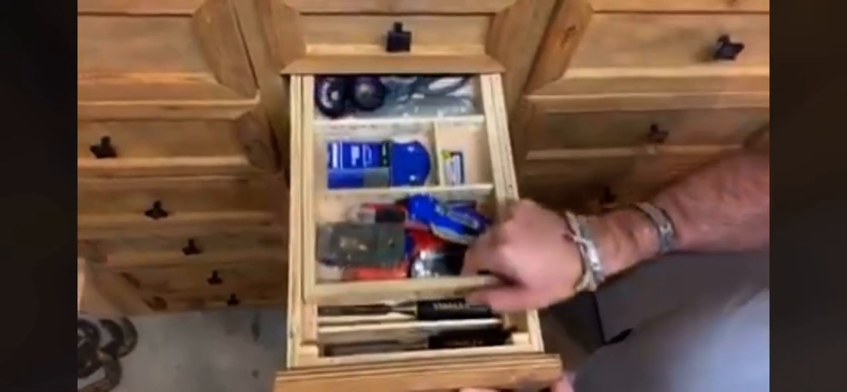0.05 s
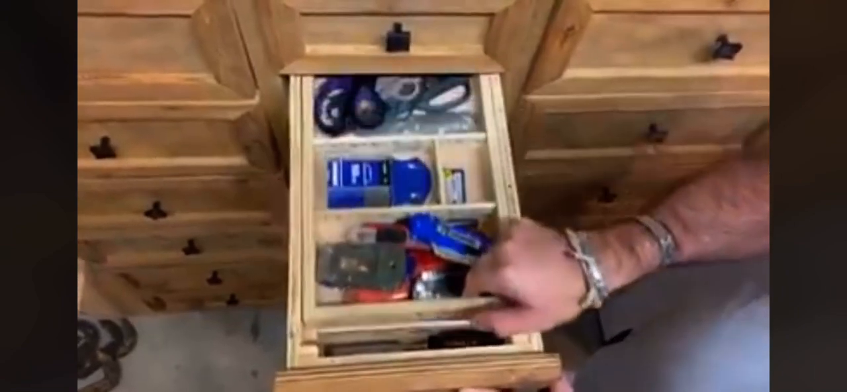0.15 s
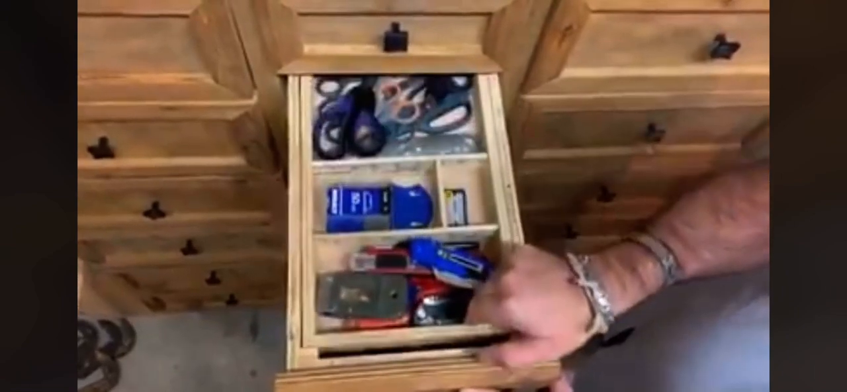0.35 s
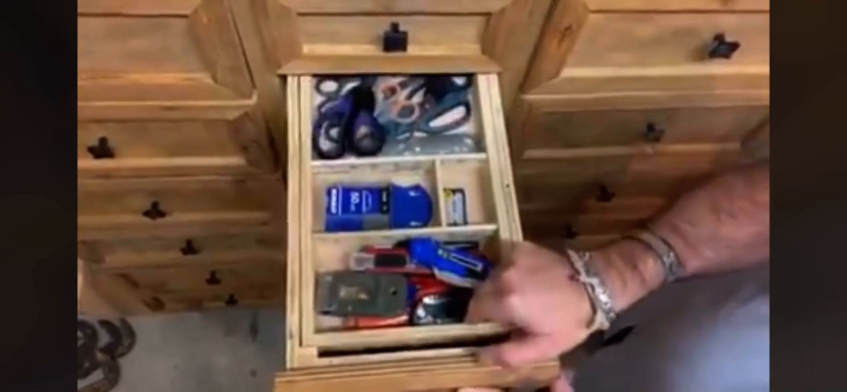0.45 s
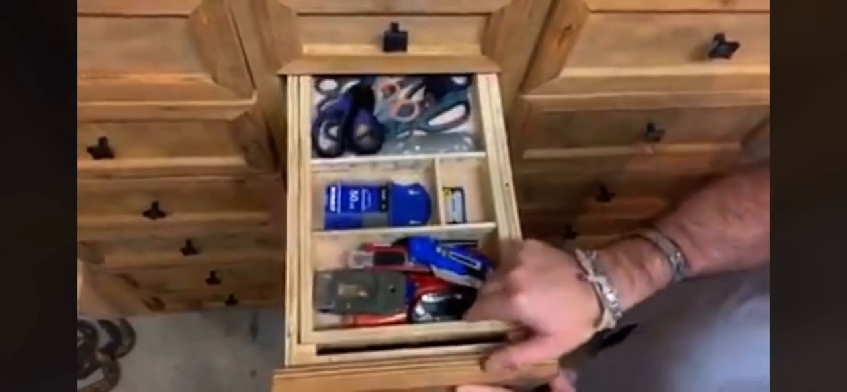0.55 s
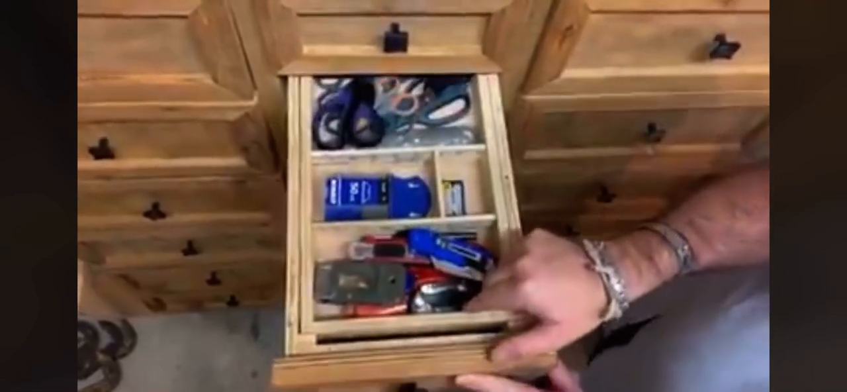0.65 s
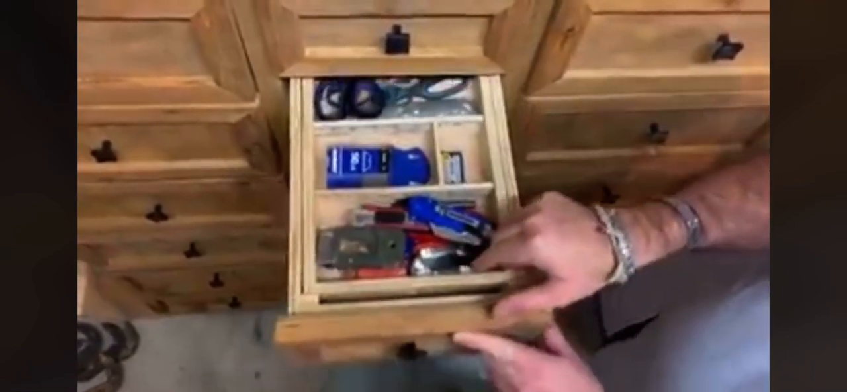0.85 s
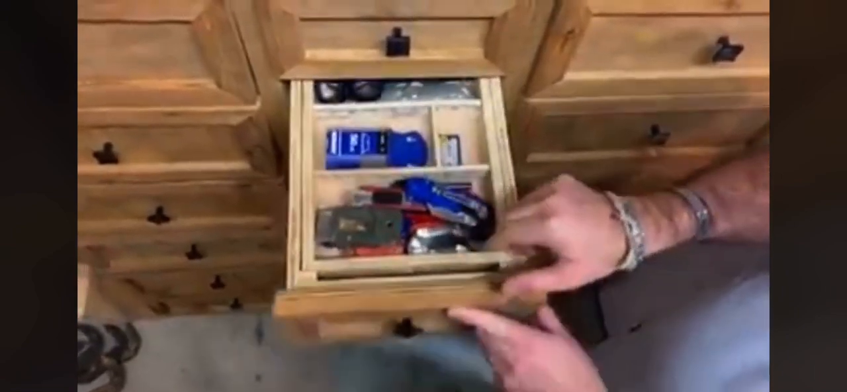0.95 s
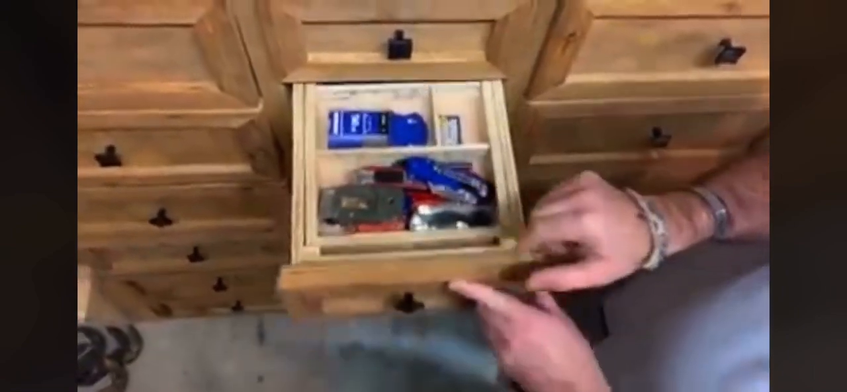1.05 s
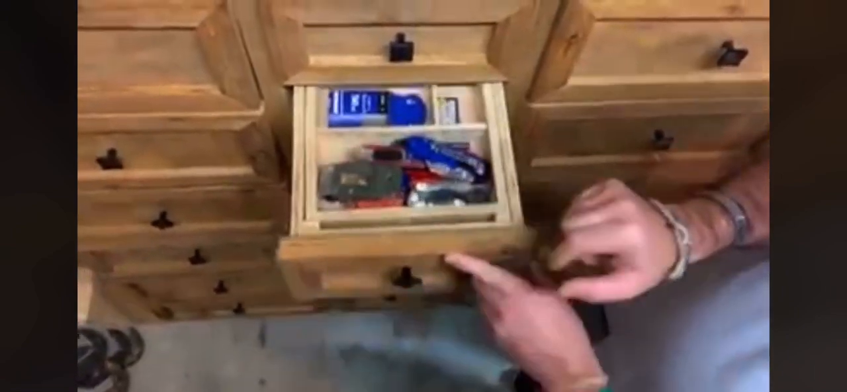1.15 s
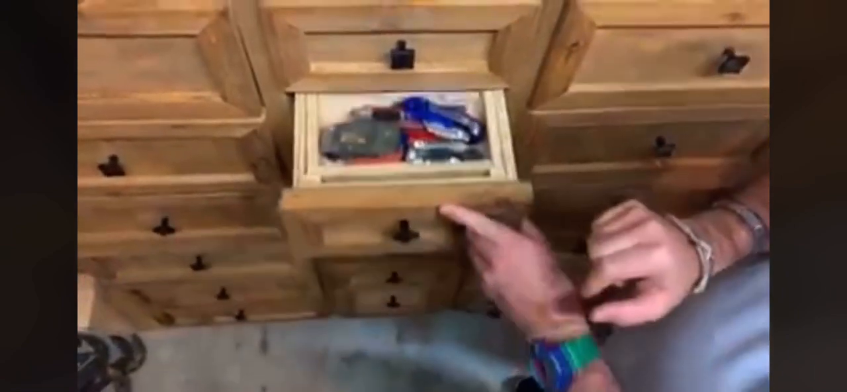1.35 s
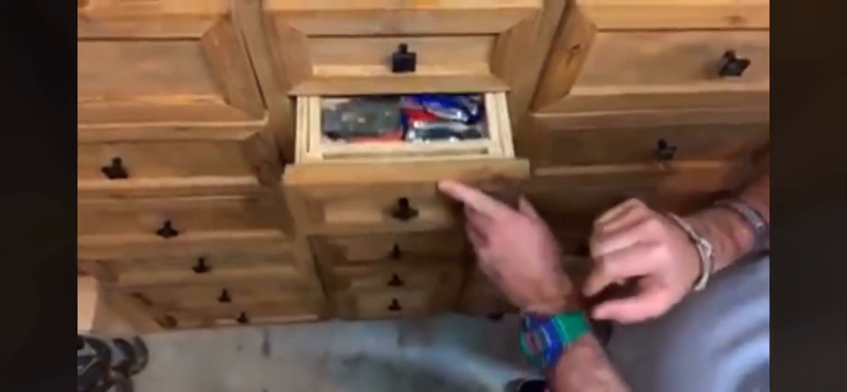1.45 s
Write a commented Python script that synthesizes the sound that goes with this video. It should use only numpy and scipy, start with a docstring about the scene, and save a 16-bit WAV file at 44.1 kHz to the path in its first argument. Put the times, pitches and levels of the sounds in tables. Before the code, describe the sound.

A wooden drawer is pushed in. First a tray inside it scrapes and knocks sharply, rattling small metal tools; then the drawer rubs along and jolts with another clatter. Heard from just above, over a low workshop rumble.

```python
"""A workshop, over a low room rumble. A wooden tray scrapes along inside a chest drawer, knocks on its
front and bounces, rattling the small tools in it. Then the drawer is pushed in: a soft rub, a jolt that
makes the tools clatter, more rub. Catching grain and short knocks ring the wood; the metal tools clink.
A phone above hears it all in stereo, its two ports out of step in the treble."""
import sys
import numpy as np
from scipy import signal
from scipy.fft import rfft, irfft
from scipy.io import wavfile
from scipy.ndimage import uniform_filter1d

SR = 44100
rng = np.random.default_rng(int(sys.argv[2]) if len(sys.argv) > 2 else 0)


def file_out(sig):
    """Save sig as 16-bit WAV at sys.argv[1]."""
    # one column per channel
    cols = np.atleast_2d(sig).T
    # limit, then scale
    lim = np.clip(cols, -1, 1)
    pcm = np.round(lim * 32767).astype(np.int16)
    wavfile.write(sys.argv[1], SR, pcm)


N = 66150

# The tray hits the front and bounces: start_s, level_db, contact_ms
TRAY_KNOCKS = [(.2175, -11.5, 0.53), (.2245, -9.5, 0.61), (.2295, -27, 0.35), (.235, -15, 0.37)]
# Jolts of the drawer: start_s, level_db, contact_ms
DRAWER_KNOCKS = [(.22, -20.5, 0.82), (.246, -20, 0.68), (.345, -40, 0.79), (.37, -38, 0.63),
                 (.75, -40.5, 2.46), (.801, -42, 0.27), (.999, -33.5, 0.69), (1.04, -40, 3.9),
                 (1.056, -39, 0.21), (1.071, -34.5, 0.18), (1.094, -24, 0.67), (1.122, -45, 0.18),
                 (1.198, -25.5, 2.64), (1.265, -44, 0.5), (1.333, -68, 0.33), (1.38, -53, 0.37)]
# Ring of the wooden tray: pitch_hz, gain_db, t60_s
TRAY_MODES = [(151, -12, 0.11), (221.2, -6, 0.16), (479.6, 5, 0.055), (546.2, -7.5, 0.15),
              (651, -3.5, 0.082), (824, -11.5, 0.25), (870, -11.5, 0.079), (948, -9.5, 0.16),
              (1106, -1.5, 0.077), (1216, 1.5, 0.071), (1384, -7, 0.068), (1503, -17.5, 0.27),
              (1695, -3.5, 0.11)]
# Ring of the hollow drawer: pitch_hz, gain_db, t60_s
DRAWER_MODES = [(123, -4, 0.1), (196, -17, 0.11), (231, -9, .2), (357.8, -8, 0.14), (388.4, -1, 0.27),
                (422, -6.5, 0.27), (704, -14.5, 0.32), (976, -15, 0.31), (1203, -10.5, 0.49),
                (1340, -3.5, 0.21), (1556, -22, 0.23), (2360, -0.5, 0.082), (3000, -16.5, 0.12)]
# EQ of the thud under each knock: freq_hz, gain_db
THUD_EQ = [(50, -12), (150, -5.5), (230, 1.5), (310, -9.5), (480, 2), (1000, -3), (1600, -11.5),
           (2700, -18.5), (4500, -28.5), (8000, -46.5)]
# Bursts of tools clicking together: start_s, level_db, t60_s, clink_db, treble_lift_db
RATTLES = [(0.222, -41, 0.066, -34.5, 10.5), (0.234, -30.5, 0.087, -32.5, -1.5),
           (.254, -33.5, 0.09, -46, 0), (0.275, -56.5, 0.14, -49, -1.5), (.535, -63, 0.46, -69, -0.5),
           (.681, -61, 0.067, -65, -13), (1.058, -47.5, 0.13, -49, -4), (1.072, -39.5, 0.21, -44, 1),
           (1.087, -34.5, 0.095, -36.5, 0), (1.098, -33, 0.089, -34.5, -0.5), (1.148, -42, 0.073, -45, 4),
           (1.171, -47.5, 0.16, -57, 4.5), (1.301, -43.5, 0.028, -64, 2)]
# Ring of the small metal tools: pitch_hz, gain_db, t60_s
TOOL_MODES = [(2594, -8, .06), (3210, -15, 0.16), (3750, -24, .1), (4003, -3, 0.039), (6285, -19.5, 0.053),
              (7240, 2, 0.034), (7790, -11.5, 0.062)]
# EQ of their clicks: freq_hz, gain_db
RATTLE_EQ = [(300, -11.5), (900, 2.5), (1800, -2.5), (2600, 6.5), (3500, 0), (4800, 0), (6500, -6.5),
             (8000, -26)]
# Rubbing pressure of the tray: time_s, level_db
TRAY_PRESSURE = [(0.0, -36.5), (0.03, -42.5), (0.04, -40.5), (0.06, -38), (0.11, -45.5), (0.194, -42),
                 (0.2, -39.5)]
# Rubbing pressure of the drawer: time_s, level_db
DRAWER_PRESSURE = [(.5, -72), (.53, -61.5), (.56, -59), (.6, -67.5), (.66, -63), (.69, -60.5), (.77, -60.5),
                   (.82, -59), (.9, -55), (1.0, -52), (1.045, -52.5), (1.09, -40.5), (1.19, -46.5),
                   (1.23, -51), (1.29, -52.5), (1.33, -49.5), (1.41, -50), (1.5, -62.5)]
# EQ of the tray's scrape: freq_hz, gain_db
TRAY_RUB_EQ = [(60, -26), (200, -10), (320, -16.5), (700, -0.5), (1300, -10.5), (2000, -16), (3000, -16),
               (5000, -19), (8000, -27.5)]
# EQ of the drawer's rub: freq_hz, gain_db
DRAWER_RUB_EQ = [(60, -18.5), (150, -1.5), (400, -2.5), (750, -9.5), (1250, -3), (1900, -12.5), (2300, -12),
                 (2500, -9.5), (2750, -13), (3500, -14), (4500, -13.5), (8000, -39)]
# Low swell, up while the drawer moves: time_s, level_db
SWELL_LEVEL = [(0.0, -64.5), (0.178, -51), (0.48, -60), (0.664, -50), (0.848, -49.5), (1.114, -46),
               (1.236, -49), (1.5, -49.5)]
# EQ of that swell: freq_hz, gain_db
SWELL_EQ = [(25, -31), (60, -2), (125, -1), (170, -3.5), (210, 1.5), (300, -11.5), (500, -17.5),
            (8000, -93.5)]
# EQ of the room rumble: freq_hz, gain_db
RUMBLE_EQ = [(25, -13.5), (60, -5), (150, -3.5), (250, -6), (500, -11), (1000, -23), (2000, -31.5),
             (4000, -43), (8000, -51.5)]
# Width, the part of the room that differs between the ports: freq_hz, gain_db
SIDE_EQ = [(60, -17.5), (200, -33.5), (400, -15.5), (600, -3.5), (1000, -8), (2200, -1.5), (3300, -9.5),
           (4500, -31), (6500, -20.5), (8000, -12)]
# Balance between the ports: freq_hz, left_over_right_db
BALANCE = [(100, 0), (300, -1.2), (600, 1.4), (1200, 1.9), (2500, .5), (4500, 0), (6000, 0), (8000, -1.9)]
# Phase lag of the left port: freq_hz, lag_rad
LEFT_LAG = [(60, 0), (3400, .2), (4650, 3.05), (5650, 3.2), (6450, 6.2), (8000, 6.4)]

THUD_DB, THUD_T60_S = -8, 0.073
RATTLE_RISE_S, TREBLE_HZ, CLINK_SPREAD_DB = .002, 4040, 3
ROOM_DB, ROOM_T60_S, RUMBLE_DB = -13, 0.38, -52.5
TOP_HZ = 8050
TIME, TAIL_TIME = np.arange(N) / SR, np.arange(SR // 2) / SR


def wood_knocks(hits, modes):
    """Half-sine pushes ring the wood, brighter the shorter the contact; a noisy thud adds body."""
    force, thud_power = np.zeros(N), np.zeros(N)
    for start_s, level_db, contact_ms in hits:
        push = np.sin(np.pi * np.clip((TIME - start_s) / contact_ms * 1000, 0, 1))
        force += undb(level_db) * push / np.sum(push)
        thud_db = level_db + THUD_DB - 20 * np.log10(2 * contact_ms)
        thud_power += decay(start_s, thud_db, THUD_T60_S) ** 2
    thud = eq(np.sqrt(thud_power) * rng.standard_normal(N), THUD_EQ)
    return ring(force, modes) + thud


def tool_rattle():
    """Each jolt clinks the tools with a random mix of their modes; dense clicks die away after it."""
    clicks = grains(per_s=2500, spread_db=0.5)
    scatter_db = CLINK_SPREAD_DB * rng.standard_normal((len(RATTLES), len(TOOL_MODES)))
    low_power, high_power, clinks = np.zeros((3, N))
    for (start_s, level_db, t60_s, clink_db, lift_db), offsets_db in zip(RATTLES, scatter_db):
        attack = np.clip((TIME - start_s) / RATTLE_RISE_S, 0, 1)
        power = (attack * decay(start_s, level_db, t60_s)) ** 2
        low_power += power
        high_power += power * undb(2 * lift_db)
        tick = np.zeros(N)
        tick[int(start_s * SR)] = undb(clink_db)
        modes = [(hz, db + offset_db + lift_db * (hz > TREBLE_HZ), ring_s)
                 for (hz, db, ring_s), offset_db in zip(TOOL_MODES, offsets_db)]
        clinks += ring(tick, modes)

    def band(power, kind):
        crossover = signal.butter(2, TREBLE_HZ, kind, fs=SR, output="sos")
        return signal.sosfilt(crossover, eq(np.sqrt(power) * clicks, RATTLE_EQ))
    # Flipping the highs avoids a notch at the crossover.
    return clinks + band(low_power, "low") - band(high_power, "high")


def wood_rub(pressure, tone, modes, ring_db, stop_s=N / SR):
    """Wood grain catches and slips thousands of times a second and sets the wood ringing."""
    friction = eq(grains(per_s=6000, spread_db=1.5) * undb(flicker_db(rate_hz=60.67)), tone)
    pressure_db = np.interp(TIME, *np.transpose(pressure), left=-99)
    scrape = undb(pressure_db) * (TIME < stop_s) * friction
    return scrape + undb(ring_db) * ring(scrape, modes) / np.std(ring(friction, modes))


def low_swell():
    """Bass noise that rises while the drawer moves."""
    level_db = np.interp(TIME, *np.transpose(SWELL_LEVEL))
    return undb(level_db) * eq(rng.standard_normal(N), SWELL_EQ)


def room_reverb(sound):
    """The workshop's reflections blur into a short noise tail."""
    tail = rng.standard_normal(len(TAIL_TIME)) * 1000. ** (-TAIL_TIME / ROOM_T60_S)
    return signal.fftconvolve(sound, tail / np.linalg.norm(tail))[:N]


def room_rumble():
    """A bed of dark noise whose level flickers slightly."""
    return undb(RUMBLE_DB + flicker_db(rate_hz=24)) * eq(rng.standard_normal(N), RUMBLE_EQ)


def phone_ports(mid, side):
    """Two ports hear the side signal in opposite polarity; the left one lags in the treble."""
    hz = np.arange(N // 2 + 1) * SR / N
    mid, side = rfft(mid), rfft(side) * undb(curve_at(SIDE_EQ, hz))
    tilt = undb(curve_at(BALANCE, hz) / 2)
    left = (mid + side) * tilt * np.exp(-1j * curve_at(LEFT_LAG, hz))
    right = (mid - side) / tilt
    return irfft(np.array([left, right]), N)


def ring(force, modes):
    """A force excites decaying modes; neighbours swing in opposite senses."""
    response = sum((-1) ** k * undb(db) * np.sin(2 * np.pi * hz * TAIL_TIME)
                   * 1000. ** (-TAIL_TIME / t60_s) for k, (hz, db, t60_s) in enumerate(modes))
    return signal.fftconvolve(force, response / np.max(np.abs(response)))[:N]


def grains(per_s, spread_db):
    """Random clicks, few of them large; rms 1."""
    chance, polarity, size = rng.random((N, 3)).T
    strength = undb(-spread_db * np.log(1 - size))
    return unit_rms((chance < per_s / SR) * np.sign(polarity - .5) * strength)


def flicker_db(rate_hz):
    """A smooth random level wobble of 1 dB rms."""
    hold = int(SR / rate_hz)
    steps = np.repeat(rng.standard_normal(N // hold + 1), hold)
    return unit_rms(uniform_filter1d(steps, hold)[:N])


def eq(sound, curve, size=4096):
    """Minimum-phase EQ of unit energy."""
    cepstrum = irfft(curve_at(curve, np.arange(size // 2 + 1) * SR / size) * np.log(10) / 20)
    cepstrum[1:size // 2] *= 2
    cepstrum[size // 2 + 1:] = 0
    response = irfft(np.exp(rfft(cepstrum)))
    return signal.fftconvolve(sound, response / np.linalg.norm(response))[:N]


def curve_at(curve, hz):
    freqs_hz, values = np.transpose(curve)
    return np.interp(np.log(hz + 1), np.log(freqs_hz), values)


def decay(start_s, level_db, t60_s):
    age_s = TIME - start_s
    return (age_s >= 0) * undb(level_db - 60 * np.maximum(age_s, 0) / t60_s)


def undb(db):
    return 10 ** (np.asarray(db) / 20)


def unit_rms(x):
    return x / np.sqrt(np.mean(x ** 2))


def scene():
    """Wood and tools up front, the room behind; the tray's scrape stops at its first knock."""
    direct = wood_rub(TRAY_PRESSURE, TRAY_RUB_EQ, TRAY_MODES, ring_db=-2, stop_s=TRAY_KNOCKS[0][0])
    direct += wood_rub(DRAWER_PRESSURE, DRAWER_RUB_EQ, DRAWER_MODES, ring_db=-9)
    direct += wood_knocks(TRAY_KNOCKS, TRAY_MODES)
    direct += wood_knocks(DRAWER_KNOCKS, DRAWER_MODES)
    direct += tool_rattle()
    mid_reverb, side_reverb = room_reverb(direct), room_reverb(direct)
    mid_rumble, side_rumble = room_rumble(), room_rumble()
    mid = direct + undb(ROOM_DB) * mid_reverb + mid_rumble + low_swell()
    return phone_ports(mid, side_reverb + side_rumble)


def record(dry):
    """The phone cuts the top with a steep low-pass."""
    return signal.sosfilt(signal.ellip(10, .2, 80, TOP_HZ, fs=SR, output="sos"), dry)


dry = scene()
out = record(dry)
file_out(out)
```